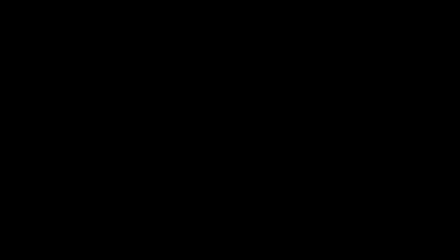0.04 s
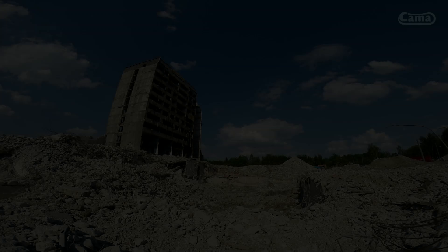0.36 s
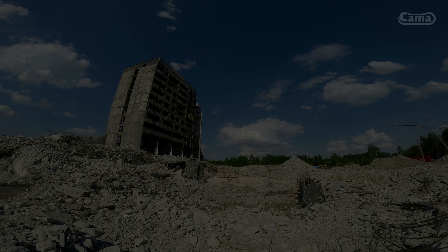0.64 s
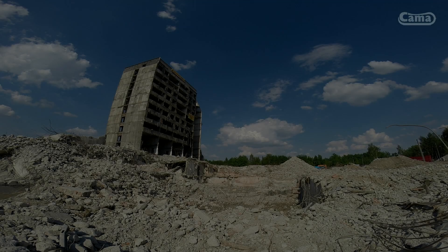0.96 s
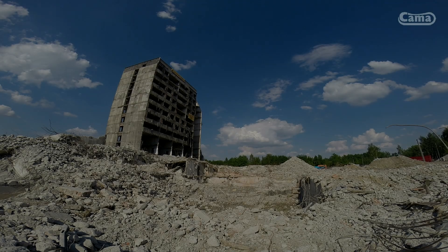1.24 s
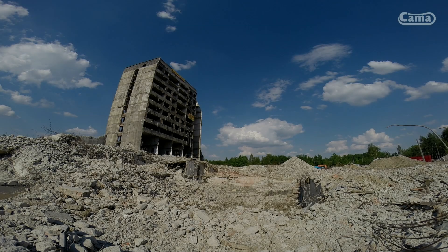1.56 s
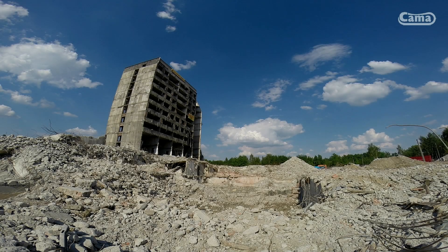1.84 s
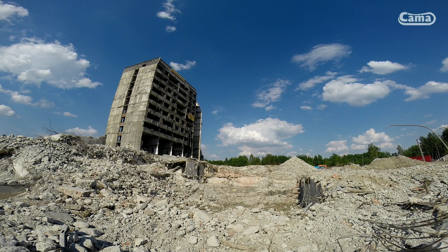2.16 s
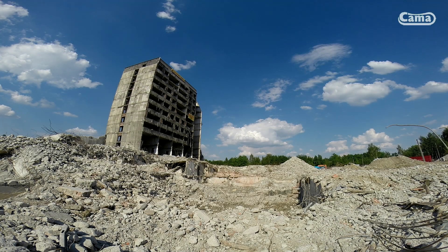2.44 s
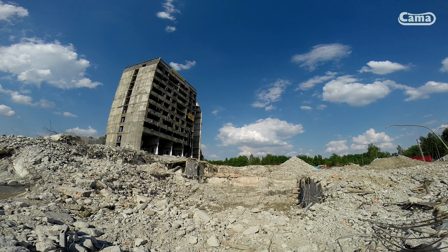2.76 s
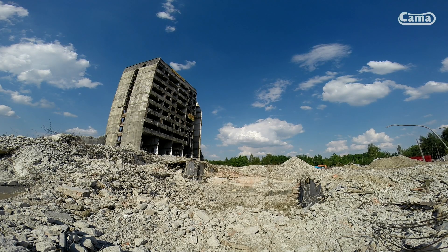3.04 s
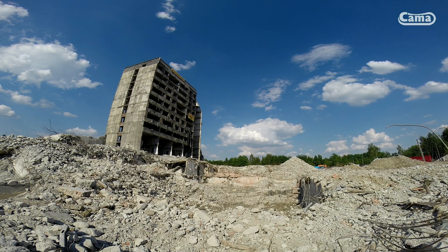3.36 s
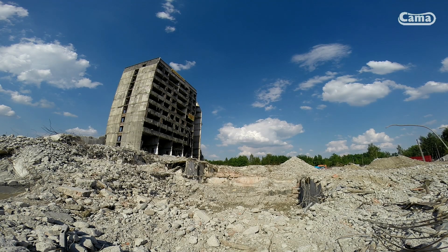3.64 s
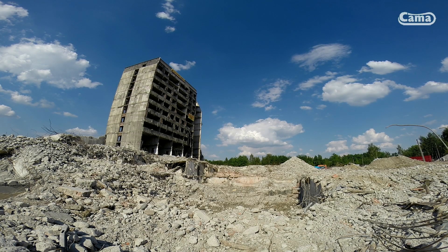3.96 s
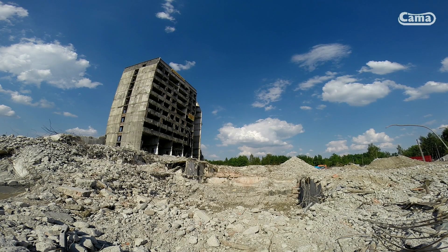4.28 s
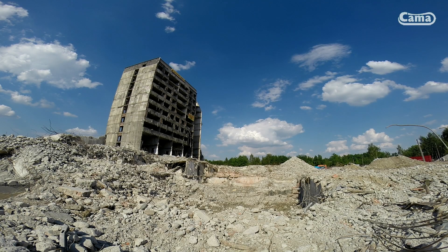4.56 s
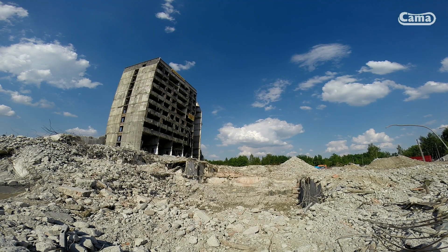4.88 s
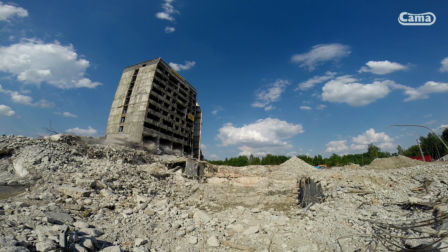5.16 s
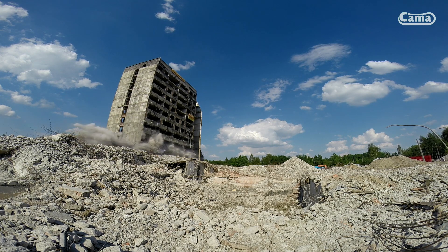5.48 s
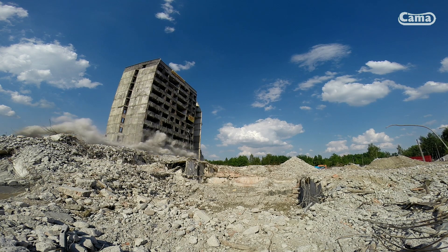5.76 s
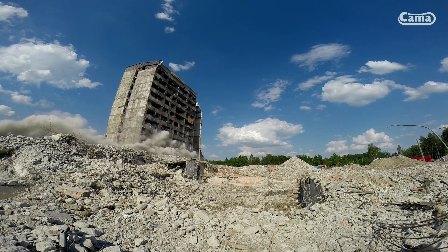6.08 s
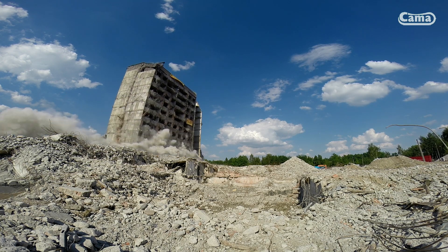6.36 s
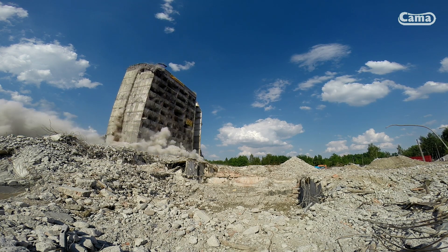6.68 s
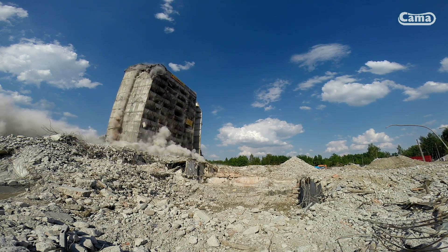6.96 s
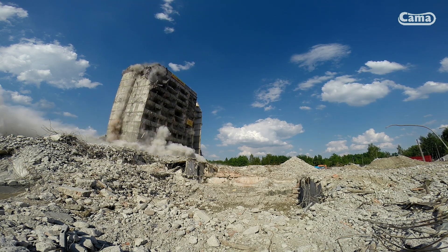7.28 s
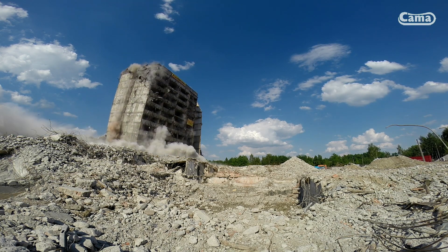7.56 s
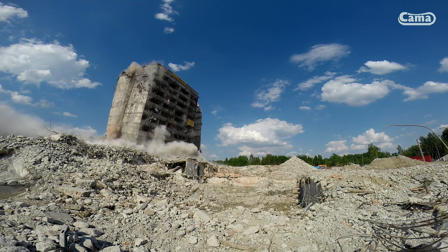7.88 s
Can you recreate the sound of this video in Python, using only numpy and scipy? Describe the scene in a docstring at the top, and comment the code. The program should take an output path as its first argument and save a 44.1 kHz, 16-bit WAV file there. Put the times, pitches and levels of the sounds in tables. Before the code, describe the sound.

Across an open demolition site, a single camera microphone picks up only quiet air and a barely audible high whine. Suddenly a tight burst of explosive charges goes off, slightly overloading it, and leaves a rolling boom and dull echo. The concrete building then collapses: floors rumble and thud, scattered fragments clack, and a steady roar of pouring rubble carries on to the end.

```python
"""Tower block demolition

A concrete tower block is blown up across a field of rubble from one microphone in a small cased camera.
Out of a faint hush the ground trembles first; then a ripple of charges cracks through the air, knocking
the case, and its echoes roll away into a dull, lingering wash. The floors come down with
a deep rumble, thudding slabs, a long rush of breaking concrete and a few clacks of debris."""
import sys
import numpy as np
from scipy import signal
from scipy.fft import rfft, irfft, next_fast_len
from scipy.io import wavfile
from scipy.ndimage import uniform_filter1d

SR = 44100
rng = np.random.default_rng(int(sys.argv[2]) if len(sys.argv) > 2 else 0)


def transcribe(u):
    """Save the signal u as a 16-bit wav file named by the first command-line argument.

    u: samples, shape (n,) or (channels, n), limited to [-1, 1]; the rate is SR.
    q: integer samples, one column per channel.
    """
    v = np.clip(np.atleast_2d(u).T, -1, 1)
    q = np.round(v * 32767).astype(np.int16)
    wavfile.write(sys.argv[1], SR, q)


N = 358091
TIME = np.arange(N) / SR
BINS = np.fft.rfftfreq(next_fast_len(N, real=True), 1 / SR)

# the faint, even hush: (frequency [Hz], relative level [dB])
HUSH_COLOUR = [(8, -21), (20, -1), (88, -0.5), (210, -5.5), (370, -9.5), (1450, -19), (2800, -23),
               (5600, -29.5), (9000, -36), (12000, -36.5), (15000, -40)]
# whine of the electronics beside the microphone: (multiple of the line rate, rms level [dB])
WHINE_PARTIALS = [(1, -77.5), (2, -73)]
# faint far-off squeaks: (time [s], level [dB], pitch [Hz], width [Hz], half length [s])
FAR_SQUEAKS = [(3.16, -70, 2760, 250, .1), (3.18, -70, 2145, 70, .05), (3.21, -67, 1610, 140, 0.098),
               (3.405, -67, 2880, 180, .028)]
# ground waves underfoot: (time [s], level [dB], pitch [Hz], half length [s])
GROUND_WAVES = [(5.279, -28, 119, 0.014), (5.299, -29, 72, 0.01), (5.329, -21, 114, 0.018)]
# charges as they reach the microphone: (time [s], relative shock level [dB], crack over shock [dB])
SHOCKS = [(5.3655, -0.5, 4), (5.3795, -6, 4), (5.3948, -12, 5.5), (5.4132, -18, 3.5), (5.4292, -22.5, 9.5),
          (5.436, -11.5, 3), (5.4612, -28, 6), (5.4647, -12, 2), (5.4708, -15, 4), (5.4756, -19.5, 2),
          (5.485, -27.5, 12), (5.489, -10, 4), (5.5019, -18, 6.5), (5.5154, -19, 1), (5.5256, -15, -2),
          (5.5384, -15.5, -3), (5.5764, -18.5, -1)]
# resonances and notches of the case around the microphone: (frequency [Hz], width [Hz], lift [dB])
CASE_RESONANCES = [(1100, 105, 4.5), (1222, 58, -4.5), (1428, 102, 8), (1648, 137, 8.5), (2350, 92, 8),
                   (2852, 180, 6.5), (3380, 145, 5.5), (4000, 67, 4), (4555, 140, 4), (5040, 250, -5),
                   (5875, 180, 5.5), (6830, 89, -6), (6900, 280, 0.5), (11000, 180, 5)]
# a charge's push, its crack and its bounce off the ground: (frequency [Hz], gain [dB])
PUSH_COLOUR = [(60, 1), (150, 1), (500, 4), (1000, 9.5), (1600, -2.5), (3000, 2), (12000, -8)]
CRACK_COLOUR = [(200, -1), (700, 2.5), (1600, 4), (2600, 2.5), (5000, 0.5), (6200, 1.5), (7600, -2.5),
                (8800, -17.5), (11500, -11), (15000, -31)]
BOUNCE_COLOUR = [(500, -13), (1500, 2.5), (2800, 10.5), (5000, -3), (10000, -29)]
# echoes, the blast's boom and the rumble of falling floors: (frequency [Hz], relative level [dB])
RETURN_COLOUR = [(400, -13), (850, -2), (1600, 2), (2200, -0.5), (3200, -2), (4500, -7.5), (6200, -13.5),
                 (7500, -18.5), (8500, -27), (11500, -30.5), (15000, -50)]
BLAST_COLOUR = [(10, -8), (30, -10), (45, -9), (63, 0), (85, -2.5), (120, -12.5), (180, -22), (400, -82)]
FALL_COLOUR = [(10, -9), (27, 5.5), (48, 0), (72, 6), (105, -5.5), (140, -10), (200, -30), (400, -59)]
# low thumps, the first charges' lingering boom and then heavy landings: (time [s], level [dB])
LOW_THUMPS = [(5.405, -18.5), (5.79, -22), (6.13, -28.5), (6.47, -31), (6.82, -30), (7.6, -36),
              (7.755, -34.5)]
# crunching columns, striking slabs, pouring concrete and grit: (frequency [Hz], relative level [dB])
COLUMN_COLOUR = [(70, -34.5), (135, 3.5), (190, -2), (230, 0), (320, -6), (480, -7.5), (750, -13),
                 (1100, -23), (2500, -55)]
STRIKE_COLOUR = [(70, -27), (130, 4), (185, -4), (240, -0.5), (310, -3.5), (430, -9), (700, -14.5),
                 (1100, -21), (2500, -70)]
STREAM_COLOUR = [(250, -15.5), (500, -7), (900, -2), (1500, 0), (2100, -1), (3200, 1), (4500, -4.5),
                 (6000, -6.5), (7600, -12), (8400, -24), (11200, -28.5), (13000, -36), (15000, -44)]
GRIT_COLOUR = [(3000, -32), (7000, -8), (11000, 9), (15000, -9)]
# single pieces of debris landing: (time [s], peak level [dB], pitch [Hz], decay time [s])
LANDINGS = [(6.388, -32, 6200, 0.0054), (6.4385, -35, 7400, 0.0023), (6.622, -17, 1560, 0.01),
            (6.625, -27.5, 5400, .01), (6.644, -20, 1790, 0.006), (6.846, -37, 10000, .015),
            (7.232, -44, 11500, .015), (7.776, -21.5, 4500, 0.0065), (7.85, -38, 10500, .012),
            (7.892, -34, 2000, .005)]

ROLL_S, ROLL_HOLD_S, ROLL_RISE_DB_PER_S = 5.515, 0.086, 43  # the blast's roll builds as the charges fire
FALL_S, FALL_HOLD_S = 6.69, 0.15  # the main mass of the floors comes down
POUR_S, POUR_HOLD_S, POUR_FADE_DB_PER_S = 6.754, 0.58, 2  # rubble pours, slowly running out


def gain_of(db):
    """Decibels to amplitude."""
    return 10 ** (np.asarray(db) / 20)


def unit_rms(x):
    """Scales to rms 1."""
    return x / np.sqrt(np.mean(x ** 2) + 1e-20)


def level_at(colour, hz):
    """A spectrum's level in dB, joined by straight lines on a log-frequency axis."""
    corners_hz, db = np.transpose(colour)
    return np.interp(np.log(hz + 1), np.log(corners_hz), db)


def add(mix, s, sound):
    """Mixes a sound in at s seconds."""
    part = mix[round(s * SR):][:len(sound)]
    part += sound[:len(part)]


def bell(x, centre, width):
    """A bell curve that falls to 1/e at width from its centre."""
    return np.exp(-((x - centre) / width) ** 2)


def noise(gain):
    """Noise of rms 1, shaped by a gain at each frequency."""
    spectrum = rng.standard_normal(len(BINS)) + 1j * rng.standard_normal(len(BINS))
    return unit_rms(irfft(gain * spectrum)[:N])


def impacts(per_s, spread_db):
    """A random train of blows whose sizes scatter by spread_db."""
    size = gain_of(spread_db * np.minimum(rng.exponential(1, N), 4)) * rng.choice([-1, 1], N)
    return unit_rms(size * (rng.random(N) < per_s / SR))


def through_case(x, colour, ring=1, size=8192):
    """Colours a sound and adds the peaks and valleys of the camera case, scaled by ring."""
    hz = abs(np.fft.fftfreq(size, 1 / SR))
    lift = sum(db * bell(hz, centre, width) for centre, width, db in CASE_RESONANCES)
    case_db = lift - uniform_filter1d(lift, size=300) * np.clip(hz / 1200, 0, 1)
    log_gain = np.log(gain_of(level_at(colour, hz) + ring * case_db))
    taps = np.fft.ifft(np.exp(np.conj(signal.hilbert(log_gain)))).real[:size // 2]  # minimum phase
    return signal.oaconvolve(x, taps)[:len(x)]


def steadied(x, span_s):
    """Holds the rms near 1, evening out swells slower than span_s."""
    window = signal.windows.hann(int(span_s * SR))
    power = signal.oaconvolve(x ** 2, window / window.sum(), "same")
    return x / np.sqrt(abs(power) + 1e-9)


def flutter(per_s, depth_db):
    """A gain that wanders at random."""
    knots = rng.standard_normal(N)
    return gain_of(depth_db * np.interp(TIME * per_s, np.arange(N), knots))


def handover(first, second, s, span_s):
    """One sound gives way to another at equal power, starting at s."""
    share = np.clip((TIME - s) / span_s, 0, 1)
    return np.sqrt(1 - share) * first + np.sqrt(share) * second


def together(*gains):
    """Unrelated causes add in power."""
    return np.sqrt(sum(gain ** 2 for gain in gains))


def swell(s, hold_s, db, rise, fall):
    """A gain that rises to db at s, holds and dies away; rise and fall are in dB a second."""
    return gain_of(db - rise * np.maximum(s - TIME, 0) - fall * np.maximum(TIME - s - hold_s, 0))


def arrived():
    """A gain that opens as the first shock front reaches the microphone."""
    return np.clip((TIME - SHOCKS[0][0]) / 0.0068, 0, 1)


def roll(db, fall):
    """Strength of the blast's roll."""
    return swell(ROLL_S, ROLL_HOLD_S, db, ROLL_RISE_DB_PER_S, fall)


def floors(db, rise, fall):
    """Strength of the main fall of the floors."""
    return swell(FALL_S, FALL_HOLD_S, db, rise, fall)


def pour(db, rise):
    """Strength of the pouring rubble."""
    return swell(POUR_S, POUR_HOLD_S, db, rise, POUR_FADE_DB_PER_S)


def hush(db=-53):
    """A faint, even hush lies under everything."""
    return gain_of(db) * noise(gain_of(level_at(HUSH_COLOUR, BINS)))


def whine(line_hz=6230.5, scans_per_s=25):
    """Right by the microphone, the electronics buzz: their whine restarts with each sensor scan."""
    scan = TIME * scans_per_s % 1
    phase = 2 * np.pi * scan * line_hz / scans_per_s
    running = np.minimum(4 * np.sin(np.pi * scan) ** 2, 1)
    return sum(gain_of(db) * unit_rms(running * np.sin(k * phase)) for k, db in WHINE_PARTIALS)


def squeaks():
    """Far off, a few narrow bands of noise swell and fade in the quiet."""
    return sum(gain_of(db) * noise(bell(BINS, hz, width)) * bell(TIME, s, half)
               for s, db, hz, width, half in FAR_SQUEAKS)


def tremor():
    """Ground waves outrun the sound in the air and shake the camera."""
    return sum(gain_of(db) * bell(TIME, s, half) * np.sin(2 * np.pi * hz * (TIME - s))
               for s, db, hz, half in GROUND_WAVES)


def charges(push_s=0.0044, crack_s=0.00084, bounce_s=0.00217, bounce_db=-6,
            scatter_db=-24, scatter_s=0.028, boom_hz=58, damping=0.7):
    """Each charge sends a ragged shock front across the field, with a ground bounce just behind."""
    t = np.arange(SR // 8) / SR
    pushes, cracks, bounces = np.zeros((3, N))
    push = -(1 - t / push_s) * np.exp(-t / push_s)
    snap = np.exp(-t / crack_s)
    scatter = gain_of(scatter_db) * np.exp(-t / scatter_s)
    for s, db, crack_db in SHOCKS:
        front, bounce = rng.choice([-1, 1], (2, len(t)))
        add(pushes, s, gain_of(db) * push)
        add(cracks, s, gain_of(db + crack_db) * front * (snap + scatter))
        add(bounces, s + bounce_s, gain_of(db + crack_db + bounce_db) * bounce * snap)
    # the microphone's bass roll-off rings under each push
    w = 2 * np.pi * boom_hz
    booms = signal.lfilter(*signal.bilinear([1, 0, 0], [1, damping * w, w * w], SR), pushes)
    return (through_case(booms, PUSH_COLOUR) + through_case(cracks, CRACK_COLOUR)
            + through_case(bounces, BOUNCE_COLOUR))


def case_knock(hz=1600, knock_db=-6, decay_s=0.0022, steepness=1.5):
    """The strongest shocks knock the camera case into a short ring; weak ones hardly move it."""
    knocks, t = np.zeros(N), np.arange(2048) / SR
    ring = -np.sin(2 * np.pi * hz * t) * np.exp(-t / decay_s)
    for s, db, _ in SHOCKS:
        add(knocks, s, gain_of(knock_db + steepness * db) * ring)
    return knocks


def echoes(dulling_db_per_khz_s=1.5, pivot_hz=2500, wash_s=5.94, wash_hold_s=0.14):
    """The blast crackles back from the site; a dull wash lingers, late echo blended with crumbling."""
    crackle = impacts(per_s=2100, spread_db=1)
    blur = impacts(per_s=7000, spread_db=2.5)
    returns = handover(crackle, blur, 5.55, span_s=0.44)
    # sound from all sides is coloured less by the case
    returns = steadied(through_case(returns, RETURN_COLOUR, ring=0.65), span_s=0.1)
    # longer paths lose more treble
    hz, t, spectra = signal.stft(returns, SR, nperseg=512)
    late_s = np.clip(t - ROLL_S, -0.1, 0.5)
    tilt_db = -dulling_db_per_khz_s * late_s * (hz[:, None] - pivot_hz) / 1e3
    dulled = signal.istft(spectra * gain_of(tilt_db), SR, nperseg=512)[1][:N]
    wash = swell(wash_s, wash_hold_s, db=-36.3, rise=12, fall=4.5)
    strength = together(roll(db=-26, fall=61), wash)
    return dulled * strength * flutter(per_s=90, depth_db=1.23) * arrived()


def rumble():
    """The boom of the blast gives way to the deeper, broader rumble of falling floors."""
    boom = steadied(through_case(rng.standard_normal(N), BLAST_COLOUR), span_s=0.039)
    falling = steadied(through_case(rng.standard_normal(N), FALL_COLOUR), span_s=0.12)
    boom *= flutter(per_s=20, depth_db=2)
    thumps = [swell(s, 0, db, rise=240, fall=210) for s, db in LOW_THUMPS]
    strength = together(roll(db=-23.5, fall=18.5), floors(db=-27.5, rise=29, fall=33),
                        pour(db=-38.5, rise=12), *thumps)
    return handover(boom, falling, 6.7, span_s=0.366) * strength * arrived()


def thuds():
    """Columns crunch in the blast; later the heavier floor slabs strike one another."""
    columns = steadied(through_case(impacts(per_s=770, spread_db=1.5), COLUMN_COLOUR), span_s=0.26)
    slabs = steadied(through_case(impacts(per_s=350, spread_db=-1), STRIKE_COLOUR), span_s=0.088)
    strength = together(roll(db=-24.5, fall=55), floors(db=-29.5, rise=99, fall=108),
                        pour(db=-39.5, rise=2))
    return handover(columns, slabs, 5.87, span_s=0.97) * strength * arrived()


def concrete_rush(grit_db=-36):
    """Concrete crumbles and pours down in a dense stream of fragments; sharp grit spits over it."""
    fragments = through_case(impacts(per_s=6000, spread_db=0), STREAM_COLOUR)
    stream = steadied(fragments * flutter(per_s=50, depth_db=0.5), span_s=0.19)
    grit = unit_rms(through_case(impacts(per_s=810, spread_db=1.5), GRIT_COLOUR))
    grit *= gain_of(grit_db) * flutter(per_s=18, depth_db=-7)
    return (stream + grit) * pour(db=-29, rise=36.5) * arrived()


def debris(log_width=0.35, attack_s=0.00033):
    """Single pieces of debris land, each with a short, noisy clack."""
    clacks, t, hz = np.zeros(N), np.arange(4096) / SR, np.fft.rfftfreq(4096, 1 / SR)
    for s, db, pitch_hz, decay_s in LANDINGS:
        colour = bell(np.log(hz + 1), np.log(pitch_hz), log_width)
        envelope = np.exp(-t / decay_s) * (1 - np.exp(-t / attack_s))
        clack = irfft(rfft(rng.standard_normal(len(t))) * colour) * envelope
        add(clacks, s, gain_of(db) * clack / abs(clack).max())
    return clacks


def scene(start_s=0.066, dip_db=-9):
    """One microphone feeds both channels from start_s on; the background sinks as the blast arrives."""
    blast = tremor() + charges() + case_knock() + echoes()
    collapse = rumble() + thuds() + concrete_rush() + debris()
    background = (hush() + whine() + squeaks()) * gain_of(dip_db * arrived())
    mono = (background + blast + collapse) * (TIME >= start_s)
    return np.array([mono, mono])


def record(dry, soft_hz=12000, edge_hz=15250):
    """The first shock overloads the camera's input; the treble rolls off softly up to a steep edge."""
    clipped = dry / (1 + dry ** 8) ** (1 / 8)
    softened = signal.lfilter(*signal.butter(1, soft_hz, fs=SR), clipped)
    band_limit = signal.firwin(255, edge_hz, window=("kaiser", 8), fs=SR)
    return signal.oaconvolve(softened, band_limit[None], "same")


dry = scene()
out = record(dry)
transcribe(out)
```